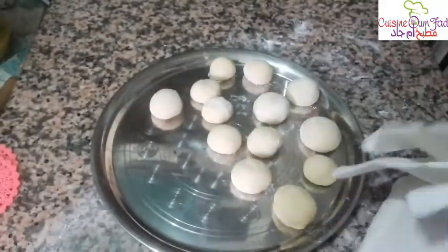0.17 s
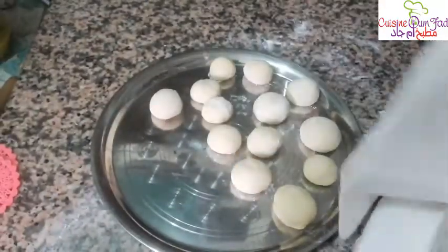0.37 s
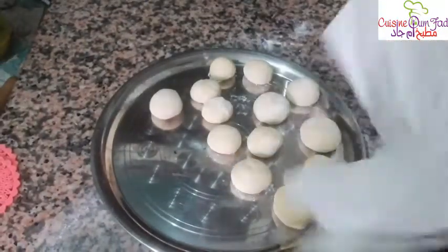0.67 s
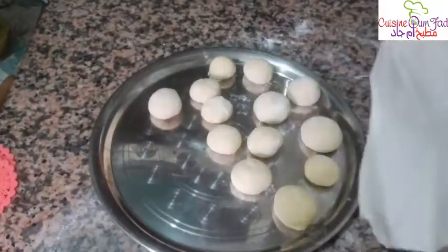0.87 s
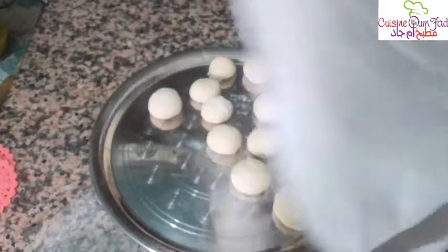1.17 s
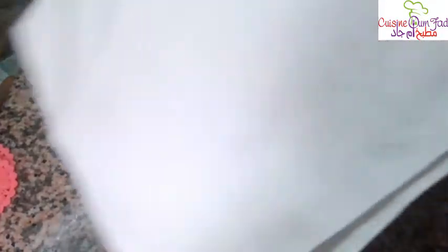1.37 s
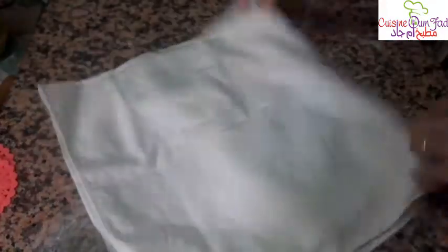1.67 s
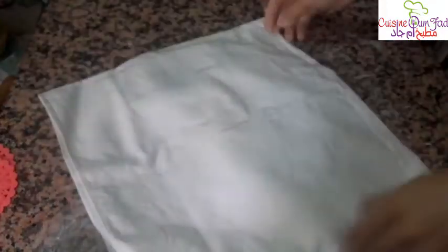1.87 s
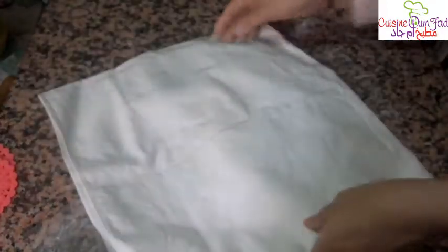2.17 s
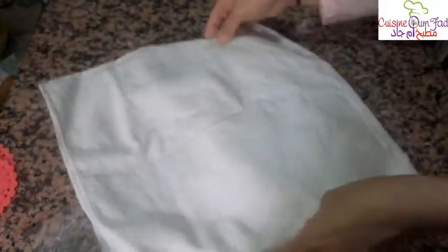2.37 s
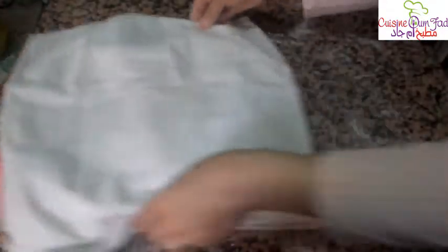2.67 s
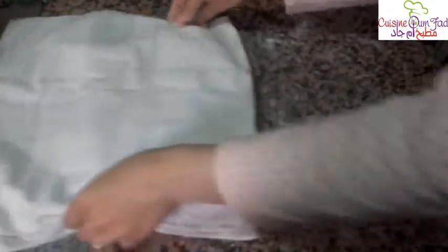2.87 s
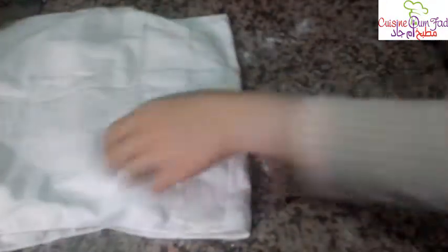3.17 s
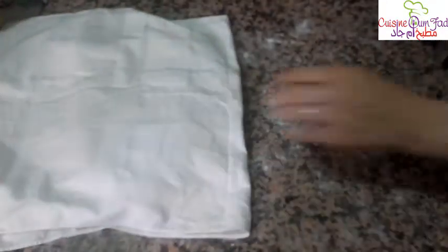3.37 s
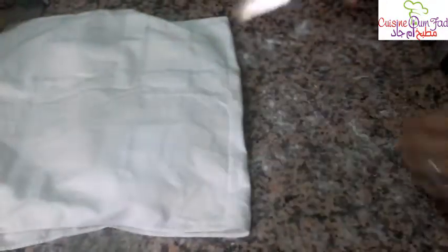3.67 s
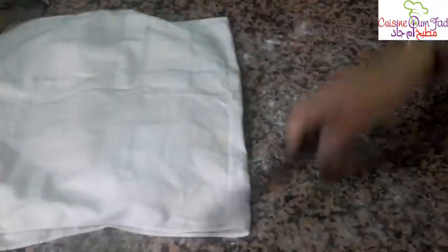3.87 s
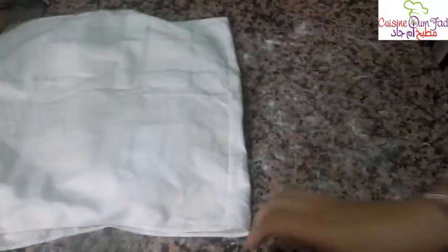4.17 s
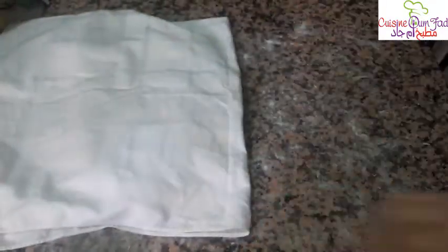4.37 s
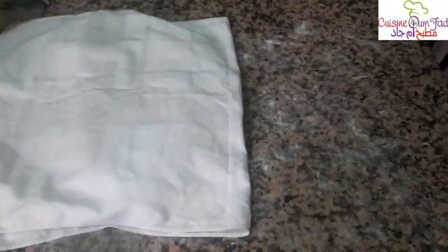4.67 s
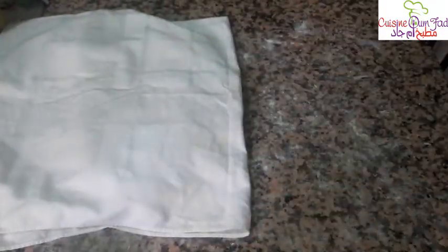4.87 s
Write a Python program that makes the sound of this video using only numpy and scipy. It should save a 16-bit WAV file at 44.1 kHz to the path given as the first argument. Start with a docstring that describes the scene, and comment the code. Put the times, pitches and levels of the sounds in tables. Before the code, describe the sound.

Soft cloth brushing and a low flap, one hollow tray knock, light hem scuffs, then a sharp hard clack on the counter over faint hum.

```python
"""Towel spread over dough

A cotton towel is shaken out and spread over dough balls on a steel tray in a small, hard-walled kitchen.
Filtered random grains make the cloth brush and billow; dispersed pulses make its folds flap.
The tray, a bank of dying sines, knocks once on the stone counter as a hand tucks the edge in.
Something small and hard lands with a double clack of pulses and ringing. An appliance hums faintly in noise.
"""
import sys
import numpy as np
from scipy import signal
from scipy.fft import rfft, irfft
from scipy.io import wavfile
from scipy.ndimage import uniform_filter1d

SR = 44100
rng = np.random.default_rng(int(sys.argv[2]) if len(sys.argv) > 2 else 0)


def digitize_waveform(pressure):
    """Quantize a signal to 16-bit integers and store it at the path in sys.argv[1].

    Rows of a 2-D input are taken as channels; values are limited to [-1, 1].
    """
    field = np.atleast_2d(pressure).T
    bounded = np.clip(field, -1, 1)
    quanta = np.round(bounded * 32767).astype(np.int16)
    wavfile.write(sys.argv[1], SR, quanta)


N = 220762

# Room air and microphone hiss. Each row: frequency in Hz, relative density in dB per Hz.
AIR_FLOOR_SPECTRUM = [(25, -14), (45, -21), (80, -24), (135, -12.5), (230, -13), (340, -12), (450, -8.5),
                      (640, -12), (1600, -18.5), (2600, -23), (3600, -28.5), (5700, -32), (9000, -30),
                      (13900, -27.5), (15200, -28), (15700, -45.5)]
# Appliance hum partials. Each row: frequency in Hz, rms level in dB, about which it wavers.
HUM_PARTIALS = [(98.7, -91), (247.6, -84), (296.1, -75.7), (397.5, -84), (493, -80), (641, -88),
                (1281, -89), (2562, -91.5), (4188, -95.5)]

# Sliding fibres. Each row: frequency in Hz, relative density in dB per Hz.
HISS_SPECTRUM = [(300, -23.5), (1500, 7), (2800, 2.5), (4300, -1), (6500, 1), (8700, 1), (10500, -0.5),
                 (13000, 0.5), (15500, -11.5)]
# Rumpling weave. Each row: frequency in Hz, relative density in dB per Hz.
WEAVE_SPECTRUM = [(70, -36), (160, -12), (400, -4.5), (700, -1), (1150, 1), (1800, -3), (2300, -16),
                  (3500, -18.5), (8000, -48)]
# Air pushed by the sheet. Each row: frequency in Hz, relative density in dB per Hz.
BILLOW_SPECTRUM = [(50, -26), (110, -11.5), (160, -2.5), (380, 1), (650, -6.5), (1300, -15.5),
                   (2500, -38.5), (6000, -59)]
# Strokes of cloth on cloth and skin as the towel is lifted, spread and tucked in, last a sleeve.
# Each row: crest in seconds, rise in seconds, fade in seconds, relative fibre hiss in dB,
# relative rumple of the weave in dB.
STROKES = [(.025, 0.0475, 0.04445, -73.5, -68), (.1, 0.0338, 0.0532, -73, -71),
           (.21, 0.0325, 0.0334, -74, -67), (.31, 0.02465, 0.051, -79, -66),
           (.402, 0.02918, 0.03367, -64, -52), (.463, 0.06144, 0.03015, -58, -54),
           (.56, 0.0379, 0.0688, -71.5, -67), (0.681, 0.03136, 0.02353, -65.5, -65.5),
           (.75, .06, .08, -72.5, -65.5), (.97, 0.05134, 0.05857, -72, -69),
           (1.145, 0.04414, 0.04893, -69.5, -66.5), (1.23, 0.02793, 0.02654, -65.5, -62),
           (1.3, 0.0474, 0.0481, -80.5, -72.5), (1.402, 0.02267, 0.01636, -76.5, -73),
           (1.752, .065, .028, -67, -50), (1.802, 0.02785, 0.02766, -69.5, -51),
           (2.173, 0.07336, 0.0338, -67.5, -58.5), (2.315, 0.05725, 0.03214, -63.5, -54.5),
           (2.425, 0.07153, 0.05465, -70.5, -56.5), (2.82, 0.11475, 0.1145, -78.5, -70.5),
           (2.89, 0.01145, 0.1176, -67.5, -69.5), (3.065, 0.10856, 0.05517, -67, -59.5),
           (4.625, 0.069, 0.08094, -61, -61), (4.76, 0.02585, 0.0653, -70, -67),
           (4.899, 0.05135, 0.07035, -77, -73)]
# Soft stir of the hanging towel while carried. One row: start in seconds, end in seconds,
# release in seconds, relative hiss in dB, relative rumple in dB.
CARRY = (0.5, 1.5816, 0.0042, -83, -76)
# The whole towel pushing air as it settles and is patted down.
# Each row: crest in seconds, rise in seconds, fade in seconds, level in dB.
BILLOWS = [(1.8, 0.0667, 0.02262, -55.5), (2.89, .01, .2, -58.5)]
# Folds going taut as the towel is shaken, lands and is patted. Each row: start in seconds, strength in dB.
FLAPS = [(.158, -54), (.401, -51), (.451, -52), (1.686, -44.5), (1.729, -48), (1.755, -41), (1.7844, -44.5),
         (1.791, -38), (1.7955, -43), (1.8058, -42), (1.809, -49.5), (3.033, -46), (3.089, -48)]
# One flap. Each row: frequency in Hz, relative level in dB.
FLAP_SPECTRUM = [(50, -28.5), (100, -4.5), (170, 4), (420, 9.5), (700, 7.5), (1300, -1.5), (1900, -19),
                 (2400, -31), (5000, -39), (14000, -49)]
# Single scuffs of a hem or a fingertip. Each row: start in seconds, strength in dB, decay in seconds.
SCUFFS = [(.625, -48, 0.00603), (.936, -48.5, 0.00386), (1.812, -48, 0.00295), (3.586, -60, 0.003794),
          (3.656, -51, 0.00481), (3.797, -43.5, 0.010994)]
# One scuff. Each row: frequency in Hz, relative level in dB.
SCUFF_SPECTRUM = [(500, -28), (2000, -8), (4200, 4), (8000, 4), (12000, 2.5), (15500, -12.5)]

# The towel sweeping right past the microphone.
# One row: crest in seconds, rise in seconds, fade in seconds, level in dB.
PASS = (1.27, .22, .22, -75)
# Finest fibres. Each row: frequency in Hz, relative density in dB per Hz.
FINE_SPECTRUM = [(4000, -30), (8000, -9), (10500, 0), (13500, 0), (15500, -9)]

# The tray's rim meeting the counter. Each row: start in seconds, strength in dB.
KNOCKS = [(2.8796, -19.5), (2.8819, -7)]
# Tray modes; the dough damps the strongest at once.
# Each row: frequency in Hz, relative level in dB, 60 dB decay time in seconds.
TRAY_MODES = [(505.45, -28.5, 0.13), (632.69, -40.5, .4), (694, -35.5, 0.12), (764.47, -30.5, .24),
              (800.22, -11, 0.037), (1046.8, -32.5, 0.42), (1154.7, -26, 0.24), (1386.8, -34.5, 0.23),
              (1511.4, -40.5, .24), (1614, -21.5, 0.15), (1638.3, 3.5, 0.014016), (1714.5, -27.5, 0.2264),
              (1782.4, -29, .18), (1855, -35, .3), (1986.9, -28.5, 0.23926), (2160, -36.5, 0.27969),
              (2050, -13, 0.0051), (2639.3, -40, .22), (2763, -14.5, .016), (3696.2, -28.5, .016),
              (4656.3, -30, 0.019972), (5770, -40, .018), (7442, -42.5, 0.013987)]
# Knock as sent to the walls. Each row: frequency in Hz, relative level in dB.
KNOCK_ROOM_SPECTRUM = [(80, -62.5), (150, -26), (320, -24.5), (470, -13), (760, -1), (930, -8), (1150, 4),
                       (1330, -7), (1630, 3), (2030, 0), (2300, -20.5), (2750, -10.5), (3500, -30),
                       (4800, -33.5), (6000, -42), (12000, -55)]

# A hard thing touching, landing and settling on the counter. Each row: start in seconds,
# relative dull thud in dB, sharp click in dB, thin tick in dB, share sent to the room in dB.
CLACKS = [(4.1785, -42, -30, -18, -5), (4.1799, -27, -27.5, -26.5, -3), (4.1822, -33, -19.5, -31, -6),
          (4.2061, -32.5, -33.5, -39, -3), (4.247, -35, -59.5, -54.5, -4.5),
          (4.2524, -19.5, -37, -28.5, -2), (4.2535, -16, -28.5, -50.5, -7.5),
          (4.255, -17.5, -38, -53, -5.5), (4.265, -23, -9, -25.5, -5), (4.272, -37.5, -24.5, -40.5, 0),
          (4.282, -29.5, -28.5, -44, -0.5)]
# Thud of the body. Each row: frequency in Hz, relative level in dB.
THUD_SPECTRUM = [(60, -41), (105, -28.5), (170, -10.5), (350, -2.5), (700, -3), (1150, 4), (1750, -1),
                 (2300, -12), (2900, -8), (4200, -12.5), (6200, -13.5), (10000, -33.5), (16000, -55.5)]
# Click of the hard edge. Each row: frequency in Hz, relative level in dB.
CLICK_SPECTRUM = [(300, -29.5), (1600, -29), (3200, -29), (4700, -8.5), (7200, 2), (9000, -0.5),
                  (11300, -9.5), (13000, -13), (16000, -27.5)]
# Tick of the hard edge. Each row: frequency in Hz, relative level in dB.
TICK_SPECTRUM = [(300, -26.5), (3000, -35), (4500, -15.5), (5600, 4), (7200, 2.5), (9500, -3.5),
                 (11800, -3), (14000, -2.5), (16000, -4)]
# Ringing of the small object after each tick.
# Each row: frequency in Hz, level relative to the tick in dB, 60 dB decay time in seconds.
SHELL_MODES = [(1270.8, -23.5, 0.054), (2896.3, -29.5, 0.0496), (3756.3, -28, .035), (5349, -32, 0.0526),
               (6221, -25.5, 0.046), (6811.8, -29, 0.315), (7359, -21.5, 0.046), (7732.4, -23, 0.0562),
               (8700, -25, 0.03905), (13517, -22.5, 0.04067)]

# Diffuse decay. Each row: frequency in Hz, 60 dB decay time in seconds.
KITCHEN_T60 = [(150, 0.48), (400, 0.5829), (1000, 0.4033), (1900, 0.40528), (2800, 0.46303), (5000, .42),
               (7300, .4), (11000, 0.4), (15000, 0.44)]
# Counter and near walls. Each row: delay in seconds, relative level in dB.
ECHOES = [(.0066, -15), (.0098, -15.5), (0.0108, -10.5), (.0158, -14), (.0188, -34), (0.0247, -12)]

FLOOR_DB = -69.5
# Movement: fall over one rise or fade time; exponent of the crest (1 = pointed).
SWELL_DB, CREST_POWER = 10.5, 1.5
# The knock's whole sound, ring and room tail, fades faster from here: start, extra fall.
FADE_S, FADE_DB_PER_S = 3.1, 160
EDGE_HZ = 15800


def amp(db):
    """Converts dB to an amplitude factor."""
    return 10 ** (np.asarray(db) / 20)


def unit(x):
    """Scales to an rms of 1."""
    return x / np.sqrt(np.mean(x ** 2) + 1e-20)


def read(points, hz):
    """Interpolates a spectrum along a log-frequency axis."""
    f, value = np.transpose(points)
    return np.interp(np.log(hz + 1), np.log(f + 1), value)


def add(mix, start_s, sound):
    """Adds a sound into the mix in place, cut at the end."""
    part = mix[round(start_s * SR):][:len(sound)]
    part += sound[:len(part)]


def colour(x, spectrum):
    """Filters a steady sound by a spectrum; rms 1."""
    gain = amp(read(spectrum, np.fft.rfftfreq(len(x), 1 / SR)))
    return unit(irfft(rfft(x) * gain, len(x)))


def wander(rate_hz):
    """Smooth random drift, mostly below rate_hz; rms 1."""
    hz = np.fft.rfftfreq(N, 1 / SR)
    lowpass = 1 / (1 + (hz / rate_hz) ** 4)
    return unit(irfft(rfft(rng.standard_normal(N)) * lowpass, N))


def background():
    """Quiet room air and microphone hiss as noise, with the wavering sines of an appliance hum."""
    t = np.arange(N) / SR
    air_db = FLOOR_DB + 0.28002 * wander(rate_hz=4)
    air = colour(rng.standard_normal(N), AIR_FLOOR_SPECTRUM) * amp(air_db)
    hum = np.zeros(N)
    for hz, rms_db in HUM_PARTIALS:
        gain = np.sqrt(2) * amp(rms_db + 1.2 * wander(rate_hz=2.4))
        phase_rad = 2 * np.pi * hz * t + 0.6 * wander(rate_hz=2.3)
        hum += gain * np.sin(phase_rad)
    return air + hum


def swell(crest_s, rise_s, fade_s):
    """Gain of one movement: gathers speed to a rounded crest, then slows."""
    t = np.arange(N) / SR - crest_s
    away = np.maximum(-t / rise_s, t / fade_s)
    return amp(-SWELL_DB * np.minimum(abs(away), 10) ** CREST_POWER)


def friction():
    """Gains of fibre hiss and weave rumple: strokes add in power to the stir of carrying."""
    start_s, end_s, release_s, hiss_db, rumple_db = CARRY
    t = np.arange(N) / SR
    carried = (t >= start_s) * np.exp(-np.maximum(t - end_s, 0) / release_s)
    power = np.outer(amp([hiss_db, rumple_db]), carried) ** 2
    for crest_s, rise_s, fade_s, hiss_db, rumple_db in STROKES:
        stroke = swell(crest_s, rise_s, fade_s)
        power += np.outer(amp([hiss_db, rumple_db]), stroke) ** 2
    return np.sqrt(power)


def grains(per_s, spread_db):
    """Tiny catches and releases of threads: sparse random impulses, sizes spread exponentially in dB."""
    size = amp(spread_db * np.minimum(rng.exponential(1, N), 4))
    present = rng.random(N) < per_s / SR
    return unit(size * rng.standard_normal(N) * present)


def pulse(spectrum, size=4096):
    """The shortest causal pulse with this spectrum (minimum phase); peak 1."""
    hz = abs(np.fft.fftfreq(size, 1 / SR))
    log_gain = np.log(amp(read(spectrum, hz)))
    minimum_phase = np.exp(np.conj(signal.hilbert(log_gain)))
    wave = np.fft.ifft(minimum_phase).real[:size // 2]
    return wave / abs(wave).max()


def disperse(x, hz, width_hz):
    """All-pass: sound near a resonance leaves late, so a pulse becomes a few swings."""
    r = np.exp(-np.pi * width_hz / SR)
    poles = np.array([1, -2 * r * np.cos(2 * np.pi * hz / SR), r * r])
    return signal.lfilter(poles[::-1], poles, x)


def scatter(x, decay_s):
    """Spreads a pulse over a short dying noise burst of unit energy."""
    t = np.arange(SR // 20) / SR
    burst = rng.standard_normal(len(t)) * np.exp(-t / decay_s)
    return signal.fftconvolve(x, burst / np.linalg.norm(burst))[:N]


def kitchen(x, build_s):
    """Diffuse tail: dense reflections that build up, then die band by band."""
    hz, t, noise = signal.stft(rng.standard_normal(SR // 2), SR, nperseg=256)
    decay = amp(-60 * t / read(KITCHEN_T60, hz)[:, None])
    tail = signal.istft(noise * decay, SR, nperseg=256)[1]
    tail = tail * (1 - np.exp(-np.arange(len(tail)) / SR / build_s))
    return signal.fftconvolve(x, tail / np.linalg.norm(tail))[:N]


def towel():
    """Fibres hiss as they slide, the weave rumples in clumps, the sheet billows, and taut folds flap."""
    sliding, bending = friction()
    hiss_grains = grains(per_s=16000, spread_db=-0.3769) * amp(1.2 * wander(rate_hz=69.426))
    hiss = colour(hiss_grains, HISS_SPECTRUM) * sliding
    rumple_grains = grains(per_s=3500, spread_db=1.0) * amp(1.8 * wander(rate_hz=59.706))
    rumple = colour(rumple_grains, WEAVE_SPECTRUM) * bending
    pushing = sum(amp(db) * swell(crest_s, rise_s, fade_s) for crest_s, rise_s, fade_s, db in BILLOWS)
    billow = colour(grains(per_s=603.03, spread_db=2.5), BILLOW_SPECTRUM) * pushing
    jolts = np.zeros(N)
    flap = disperse(pulse(FLAP_SPECTRUM), hz=588.3, width_hz=1289.5)
    for start_s, db in FLAPS:
        add(jolts, start_s, amp(db) * flap)
    for start_s, db, decay_s in SCUFFS:
        add(jolts, start_s, amp(db) * scatter(pulse(SCUFF_SPECTRUM), decay_s))
    cloth = amp(3.5) * hiss + amp(-2.5) * rumple + billow + jolts
    return cloth + amp(-11) * kitchen(cloth, build_s=0.006)


def close_pass():
    """A thin, high sheen of fine fibres as the cloth swings by the microphone."""
    crest_s, rise_s, fade_s, db = PASS
    sheen = colour(rng.standard_normal(N), FINE_SPECTRUM)
    return amp(db) * swell(crest_s, rise_s, fade_s) * sheen


def ringing(modes, rise_s):
    """Dying sines that swell over the time of the contact."""
    t = np.arange(SR // 2) / SR
    ring = np.zeros(len(t))
    for hz, db, t60_s in modes:
        ring += amp(db - 60 * t / t60_s) * np.sin(2 * np.pi * hz * t)
    return ring * (1 - np.exp(-(t / rise_s) ** 2))


def near_echoes(x):
    """Single reflections from the closest hard surfaces."""
    out = np.zeros(N)
    for delay_s, db in ECHOES:
        add(out, delay_s, amp(db) * x)
    return out


def tray():
    """A cushioned blow rings the tray's modes, the room answers, and the whole sound then fades out quickly."""
    # the ring carries no deep bass
    bass_cut = signal.butter(2, 300, "high", fs=SR, output="sos")
    ring = signal.sosfilt(bass_cut, ringing(TRAY_MODES, rise_s=0.0010618))
    direct, to_room, touch = np.zeros(N), np.zeros(N), np.zeros(N)
    for start_s, db in KNOCKS:
        add(direct, start_s, amp(db) * ring)
        add(to_room, start_s, amp(db) * pulse(KNOCK_ROOM_SPECTRUM))
    # first touch of bare steel on stone
    add(touch, KNOCKS[0][0], amp(-27.0) * pulse(THUD_SPECTRUM))
    echoes = amp(-8) * near_echoes(direct)
    tail = amp(-1.5) * kitchen(to_room, build_s=0.0058)
    fading_s = np.maximum(np.arange(N) / SR - FADE_S, 0)
    return amp(-FADE_DB_PER_S * fading_s) * (direct + touch + echoes + tail)


def clacks():
    """Each contact mixes a dull thud of the body with a click and a tick of its hard edge."""
    thud = disperse(pulse(THUD_SPECTRUM), hz=1048.5, width_hz=740)
    click = disperse(pulse(CLICK_SPECTRUM), hz=7900, width_hz=5000)
    shapes = np.array([thud, click, pulse(TICK_SPECTRUM)])
    shell = ringing(SHELL_MODES, rise_s=0.000361)
    room_boost = amp([4.5, 1, 6])  # thud, click, tick
    out = np.zeros(N)
    for start_s, thud_db, click_db, tick_db, room_db in CLACKS:
        sizes = amp([thud_db, click_db, tick_db])
        contact = amp(1.5) * sizes @ shapes
        add(out, start_s, contact)
        add(out, start_s, sizes[2] * shell)
        # the counter and the things on it scatter each contact over a few milliseconds
        add(out, start_s, amp(-5.5) * scatter(contact, decay_s=0.0041))
        to_room = (sizes * room_boost) @ shapes
        add(out, start_s, amp(room_db) * kitchen(to_room, build_s=0.004318))
    return out


def scene():
    """Sums all sources into one channel."""
    mix = background() + towel() + close_pass() + tray() + clacks()
    return mix[None]


def record(dry):
    """The small microphone loses the deep bass; a low-pass then limits the band."""
    bass_cut = signal.butter(1, 25, "high", fs=SR, output="sos")
    thin = signal.sosfilt(bass_cut, dry)
    band_limit = signal.firwin(401, EDGE_HZ, window=("kaiser", 9), fs=SR)
    return signal.oaconvolve(thin, band_limit[None], "same")


dry = scene()
out = record(dry)
digitize_waveform(out)
```